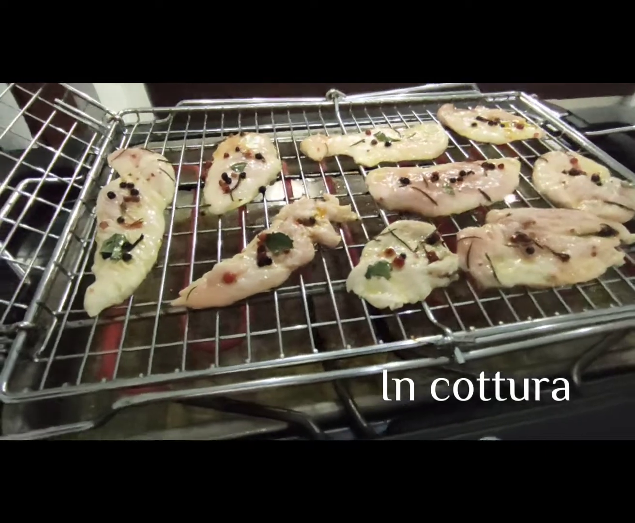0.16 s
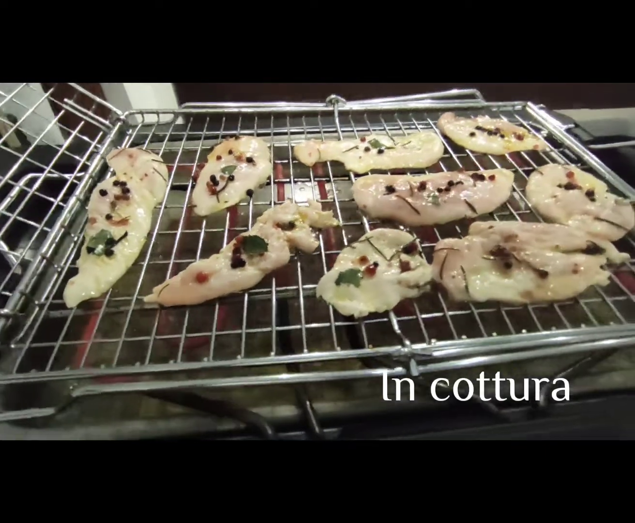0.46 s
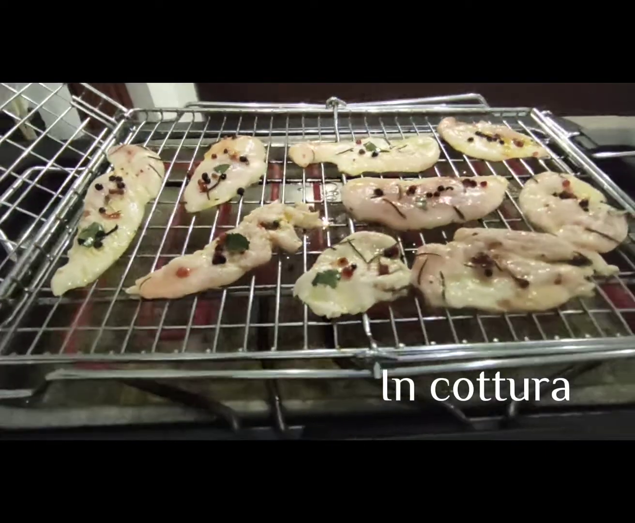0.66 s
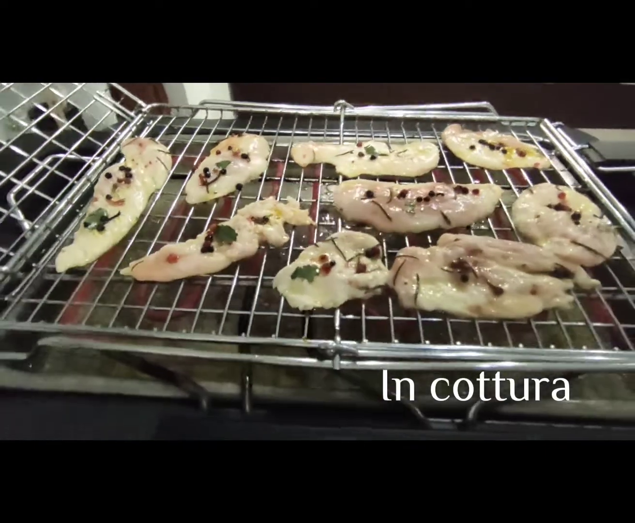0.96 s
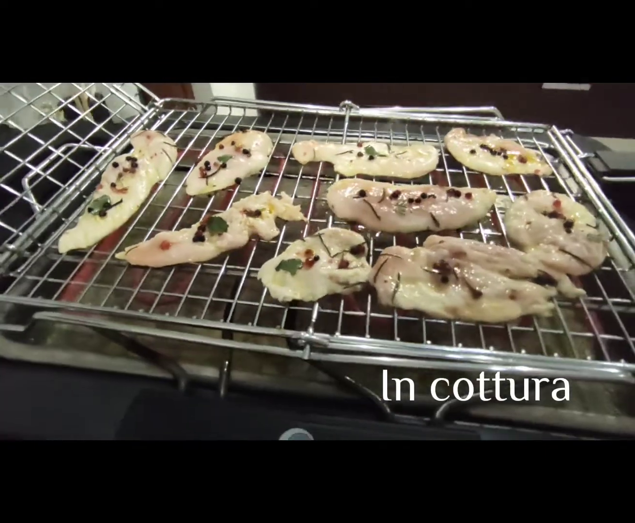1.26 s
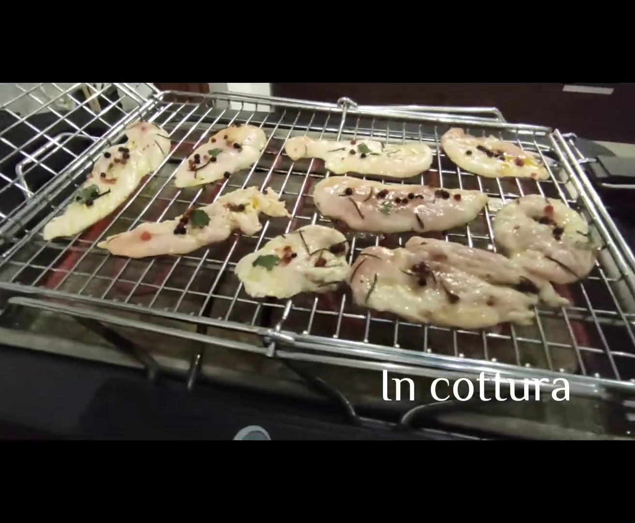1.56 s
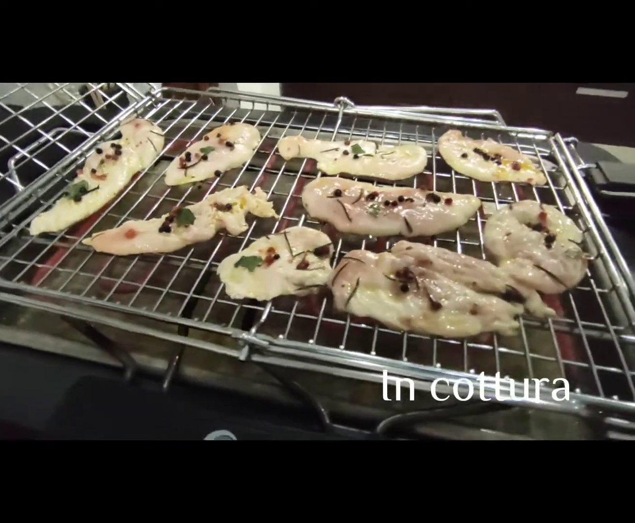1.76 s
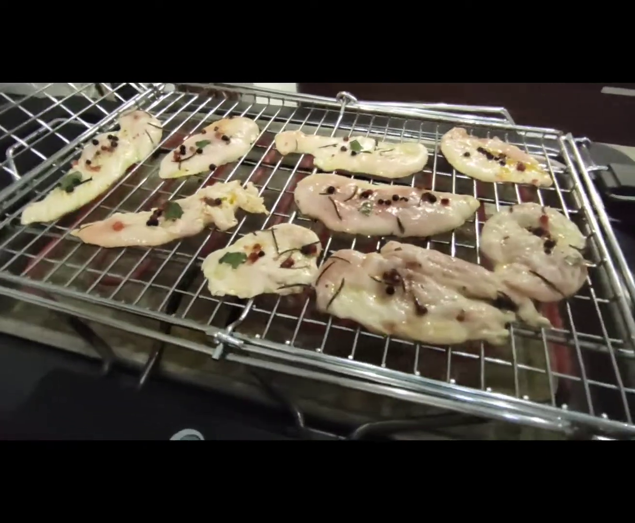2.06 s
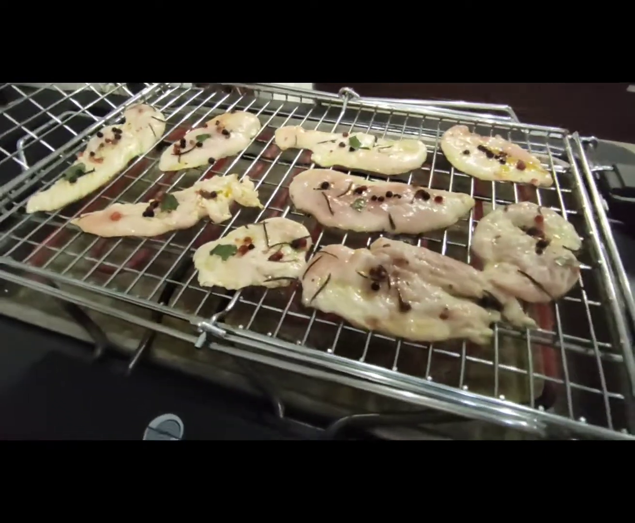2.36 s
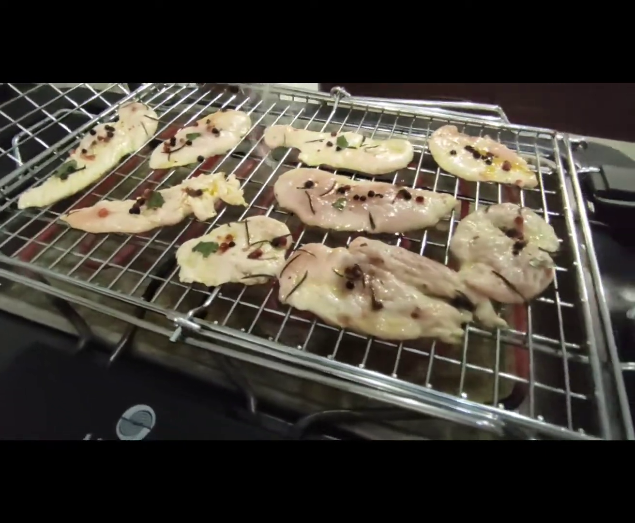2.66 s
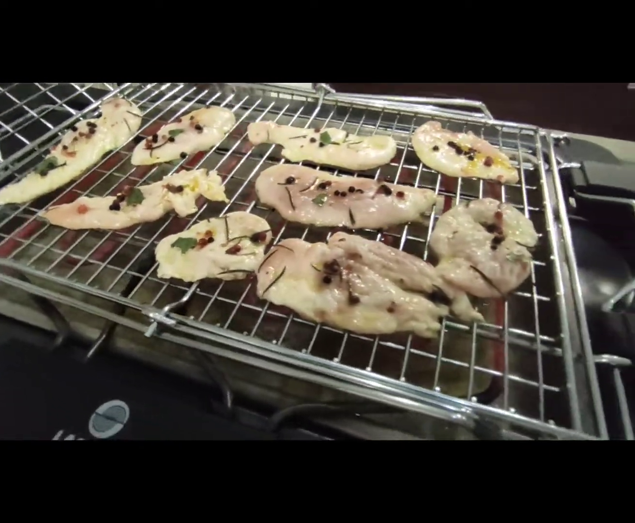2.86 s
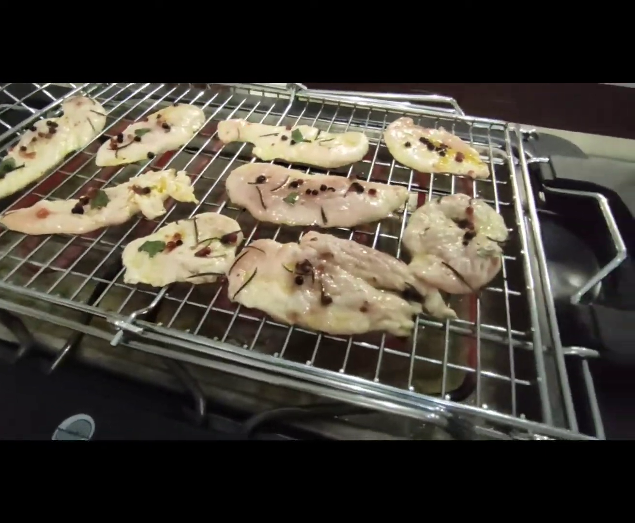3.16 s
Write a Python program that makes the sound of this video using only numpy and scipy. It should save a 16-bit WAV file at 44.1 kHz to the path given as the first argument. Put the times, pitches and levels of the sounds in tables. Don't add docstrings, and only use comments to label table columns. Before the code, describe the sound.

Meat sizzles on an electric grill, close up: a quiet, bright hiss of tiny crackles with rapid, nearly regular ticking throughout. Small pops cluster at 0.1-0.4 s; sharp spits flare at 0.94 and 1.16 s. It calms until 2.17 s, then pops thickly, strongest near 2.37 s. A hard sputter snaps on the right at 2.92-3.02 s and fizzes away. Faint low appliance hum, short kitchen reverberation, small stereo microphones.

```python
import sys
import numpy as np
from scipy import signal
from scipy.fft import rfft, irfft
from scipy.io import wavfile
from scipy.ndimage import uniform_filter1d

SR = 44100
rng = np.random.default_rng(int(sys.argv[2]) if len(sys.argv) > 2 else 0)


def log_audio(samples):
    frames = np.atleast_2d(samples).T
    limited = np.clip(frames, -1, 1)
    pcm = np.round(limited * 32767).astype(np.int16)
    wavfile.write(sys.argv[1], SR, pcm)


def amplitude_ratio(level_db):
    exponent = np.asarray(level_db, float) / 20
    return 10 ** exponent


N = 145530


def evened(x):
    return x / np.sqrt(np.mean(x ** 2) + 1e-20)


def read(points, hz):
    f, value = np.transpose(points)
    return np.interp(np.log(hz + 1), np.log(f + 1), value)


def add(mix, s, sound):
    part = mix[:, round(s * SR):][:, :sound.shape[1]]
    part += sound[:, :part.shape[1]]


def resonate(x, hz, width_hz):
    r = np.exp(-np.pi * width_hz / SR)
    return 2 * signal.lfilter([1 - r], [1, -r * np.exp(2j * np.pi * hz / SR)], x).real


def resonate_twice(x, hz, width_hz):
    return resonate(resonate(x, hz, width_hz), hz, width_hz)


def panned(x, lean_db):
    return x * amplitude_ratio(np.array([[.5], [-.5]]) * lean_db)


def capsules(x):
    # frequency in Hz, gain in dB.
    burst_colour = [(200, -34.5), (700, -21), (2300, -20), (3600, -20), (6200, -12.5), (10000, -17.5),
                    (15000, -20), (16300, -38.5)]
    # frequency in Hz, width in Hz, gain in dB.
    cavities = [
        [(7930, 660, 9), (8680, 1200, 14)],
        [(7400, 750, 13), (8060, 1330, 14)],
    ]
    hz = abs(np.fft.fftfreq(1024, 1 / SR))
    log_gain = np.log(amplitude_ratio(read(burst_colour, hz)))
    phase = -signal.hilbert(log_gain).imag
    taps = np.fft.ifft(np.exp(log_gain + 1j * phase)).real[:512]
    x = signal.oaconvolve(x, taps[None], axes=1)[:, :x.shape[1]]
    out = x.copy()
    for side, peaks in enumerate(cavities):
        for f, width_hz, db in peaks:
            out[side] += amplitude_ratio(db) * resonate_twice(x[side], f, width_hz)
    return out


def sizzle():
    # time in seconds, level in dB.
    heat = [(0, -50), (.14, -58), (.16, -44.5), (.3, -53.5), (.93, -53), (.945, -36.5), (1.1, -51),
            (1.16, -52.5), (1.17, -46.5), (1.4, -57.5), (2.15, -55.5), (2.19, -44.5), (2.24, -41.5),
            (2.28, -37.5), (2.43, -38.5), (2.53, -50.5), (3.0, -52.5), (3.015, -38)]
    cool_db_per_s, rest_db = 97, -54
    fizz_from_s, fizz_to_s, fizz_db, fizz_fade_db_per_s = 2.921, 2.98, 9, 400
    bubbles_per_s, bubble_s, biggest, spread_db = 2500, 0.00068, 0.0076, 3.5
    lag_s, scatter_db, smooth_db = .0003, 3, -4.5

    t = np.arange(N) / SR
    last_s, last_db = heat[-1]
    cooling_db = np.maximum(last_db - cool_db_per_s * (t - last_s), rest_db)
    heat_db = np.where(t < last_s, np.interp(t, *np.transpose(heat)), cooling_db)
    fizz = np.clip(fizz_db - fizz_fade_db_per_s * (t - fizz_to_s), 0, fizz_db)
    heat_db = heat_db + (t > fizz_from_s) * fizz

    hit, big, lag, lean, kind = rng.random((N, 5)).T
    size = amplitude_ratio(-spread_db * np.log(big + biggest)) * (hit < bubbles_per_s / SR)
    late = np.arange(N) + np.round((2 * lag - 1) * lag_s * SR).astype(int)
    late = np.clip(late, 0, N - 1)
    lean_gain = amplitude_ratio(scatter_db * (2 * lean - 1))
    clicks = np.zeros((2, N))
    shapes = rng.standard_normal((16, 128)) * np.exp(-t[:128] / bubble_s)
    for k, shape in enumerate(shapes):
        some = size * ((kind * len(shapes)).astype(int) == k)
        pulses = [some * lean_gain, np.bincount(late, some / lean_gain, N)]
        clicks += signal.oaconvolve(pulses, evened(shape)[None], axes=1)[:, :N]
    hiss = amplitude_ratio(smooth_db) * rng.standard_normal((2, N))
    return amplitude_ratio(heat_db) * evened(capsules(evened(clicks) + hiss))


def kitchen():
    # frequency in Hz, level in dB per Hz.
    floor = [(12, -27), (20, 5), (106, -11), (138, -9), (167, -4), (311, -10), (414, -10), (2860, -26),
             (6000, -19), (7800, -44), (13200, -120)]
    # frequency in Hz, left-right likeness from -1 to 1.
    likeness = [(60, -0.02), (180, 0.45), (550, 0.65), (1650, -0.042), (4970, 0.14), (15000, -0.25)]
    # frequency in Hz, left-right difference in dB.
    balance = [(60, 4), (240, 5.5), (950, 7.5), (3770, -10), (15000, 1)]
    # frequency in Hz, width in Hz, level in dB.
    hum = [
        (165.8, 2.9, -66),
        (209.8, 13.4, -77.5),
        (411.2, 31, -84.5),
    ]
    floor_db, hum_lean_db = -62.5, 8
    murmur_s, murmur_span_s, murmur_db = 1.65, 0.3, 8

    hz = np.fft.rfftfreq(N, 1 / SR)
    a, b = rfft(rng.standard_normal((2, N)))
    same = np.clip(read(likeness, hz), -1, 1)
    z = np.array([a, same * a + np.sqrt(1 - same ** 2) * b])
    z = z * panned(amplitude_ratio(read(floor, hz)), read(balance, hz))
    out = amplitude_ratio(floor_db) * evened(irfft(z, N))

    t = np.arange(N) / SR
    steady = 0.68
    for f, width_hz, db in hum:
        waver = evened(resonate_twice(rng.standard_normal(N + SR), f, width_hz)[SR:])
        tone = steady * np.sqrt(2) * np.sin(2 * np.pi * f * t) + (1 - steady) * waver
        out += panned(amplitude_ratio(db) * evened(tone), hum_lean_db)
        steady = 0
    swell = np.exp(-((t - murmur_s) / murmur_span_s) ** 2)
    return out + panned(amplitude_ratio(db + murmur_db) * swell * np.roll(waver, SR), hum_lean_db)


def vent():
    # time in seconds, ticks so far, peak in dB.
    venting = [(0.003, 0, -45), (.315, 27, -43), (.504, 47, -41), (.754, 77, -41), (.920, 96, -41),
               (1.118, 120, -42), (1.304, 143, -41), (1.436, 158, -45), (1.734, 197, -43),
               (1.964, 225, -40), (2.100, 240, -40), (2.169, 248, -39), (2.582, 290, -42),
               (2.779, 310, -42), (3.058, 340, -36), (3.198, 354, -38), (3.250, 359, -36),
               (3.297, 363, -35)]
    # frequency in Hz, width in Hz.
    tick_ring = [
        (8400, 1600),
        (7810, 1180),
    ]
    jitter_s, left_lag_s = .0004, .0006
    level_db, scatter_db, lean_db = -.5, 1.5, -7

    s, count, db = np.transpose(venting)
    out = np.zeros((2, N))
    clicks = np.arange(300) == np.array([[round(left_lag_s * SR)], [0]])
    for at in np.interp(np.arange(count[-1] + 1), count, s):
        shift, size, bend = rng.standard_normal(3)
        tick = np.array([resonate_twice(1. * click, f * (1 + .03 * bend), width_hz)
                         for click, (f, width_hz) in zip(clicks, tick_ring)])
        tick = tick / abs(tick).max(axis=1, keepdims=True)
        tick = tick * amplitude_ratio(np.interp(at, s, db) + level_db + scatter_db * size)
        add(out, abs(at + jitter_s * shift), panned(tick, lean_db))
    return out


def spitting(noise, length_s):
    t = np.arange(noise.shape[-1]) / SR
    return noise * t / length_s * np.exp(-2 * t / length_s)


def burst(length_s, body_db, ring):
    spit = spitting(rng.standard_normal((2, 900)), length_s)
    top = ring(spit)
    plop = resonate_twice(spit[0], 1480, 2600)
    plop = signal.lfilter(*signal.butter(2, 550, "high", fs=SR), plop)
    top = top / abs(top).max(axis=1, keepdims=True)
    return top + amplitude_ratio(body_db + 0.5) * plop / abs(plop).max()


def pops():
    # start in seconds, peak in dB, low body re peak in dB, left-right in dB.
    large_bursts = [(0.0644, -47, -29, -9), (0.1271, -37.5, -37, -2), (0.1459, -26.5, -31, -3),
                    (0.187, -33, -18.5, -2.0), (0.215, -37, -37, 1), (0.2378, -35, -44, -12.5),
                    (0.3142, -42, -33, -10), (0.3634, -35, -34, -2), (0.5130, -40, -21, -6),
                    (0.5470, -40.5, -28, -4), (0.7662, -41, -37, -5), (0.8909, -36.5, -24, -5),
                    (0.9382, -16.5, -27, -9), (0.9523, -29, -23, 4), (1.163, -24.5, -45, -4.5),
                    (2.1745, -41, -29, -4), (2.1846, -37, -29, -4), (2.1889, -33, -32, -9),
                    (2.1960, -35, -28, -4), (2.25, -38, -16, -11), (2.2562, -32.5, -8.5, -2),
                    (2.2724, -29, -19, -13), (2.2862, -24.5, -16.5, -2.5), (2.336, -33.5, -13, -1),
                    (2.365, -16.5, -23, -2), (2.3800, -31, -24, -1), (2.3930, -32, -24, -4),
                    (2.399, -30, -26, -4), (2.4236, -24, -22.5, -4), (2.4510, -32.5, -25, -4),
                    (2.4720, -38, -30, -2), (2.5559, -33.5, -38, -4), (2.5660, -36, -36, -2),
                    (2.6845, -32.5, -25, -4), (2.7254, -32, -46, -4.5), (2.8570, -39, -24, -9),
                    (2.8795, -33, -40, -4.5), (3.2350, -43.5, -14, -6)]
    out = np.zeros((2, N))
    for s, db, body_db, lean_db in large_bursts:
        add(out, s, panned(amplitude_ratio(db + 1.5) * burst(.002, body_db, capsules), lean_db))
    return out


def puff(db, hz, width_hz, length_s):
    x = resonate_twice(spitting(rng.standard_normal(3000), length_s), hz, width_hz)
    return amplitude_ratio(db) * x / abs(x).max()


def knocks():
    # start in seconds, peak in dB, centre in Hz, width in Hz, length in seconds.
    spits = [
        (1.1810, -49.5, 440, 200, 0.011),
        (2.8000, -56, 1700, 1400, .003),
        (2.9500, -44.5, 670, 790, 0.0031),
        (2.9220, -42.5, 1120, 700, 0.0034),
        (1.7, -52, 4400, 1600, .003),
        (2.6850, -50, 2000, 2300, 0.0017),
        (2.2870, -41, 770, 700, 0.004),
        (0.8600, -58, 860, 1300, .0035),
        (3.0110, -44, 770, 980, 0.0032),
        (2.9225, -42.5, 2200, 830, 0.0021),
    ]
    out = np.zeros((2, N))
    for s, db, hz, width_hz, length_s in spits:
        add(out, s, panned(puff(db, hz, width_hz, length_s), 1.5))
    return out


def snaps():
    # start in seconds, peak in dB, centre in Hz, width in Hz, left-right in dB.
    ruptures = [
        (.9386, -32, 14600, 2500, -1),
        (.9390, -33.5, 2160, 1000, 3),
        (1.1635, -46.5, 2180, 1010, -2),
        (2.0655, -49, 14000, 3500, -6),
        (2.3655, -35.5, 2260, 1500, -2),
        (2.6845, -47, 14000, 4000, -3),
        (2.9925, -30, 13000, 5000, -6),
        (3.0101, -13.5, 10400, 6900, -2),
        (3.0103, -30, 2200, 2200, -4),
        (3.1236, -39, 2380, 2620, -18),
    ]
    out = np.zeros((2, N))
    for s, db, hz, width_hz, lean_db in ruptures:
        add(out, s, panned(puff(db, hz, width_hz, 0.00062), lean_db))
    return out


def sputter():
    # start in seconds, peak in dB, low body re peak in dB, left-right in dB.
    sputters = [(2.9209, -24, -20, -13), (2.9231, -20.5, -20.5, -10), (2.9284, -34, -30, -10),
                (2.9400, -22.5, -41, -15.5), (2.9458, -26, -32, -17), (2.9530, -29, -21, -12),
                (2.9610, -23, -28, -20), (2.9661, -23, -26, -14.5), (2.9744, -33, -28, -5),
                (2.9815, -38, -30, -6), (2.9923, -17.5, -33, -17), (3.0102, -14.5, -30, -13),
                (3.0115, -18, -30, -18.5), (3.0247, -33, -24, -3)]

    def ring(x):
        left, right = capsules(x)
        return np.array([left, 0.052 * right + resonate_twice(x[1], 7390, 600)])

    out = np.zeros((2, N))
    for s, db, body_db, lean_db in sputters:
        add(out, s, panned(amplitude_ratio(db - 1) * burst(0.00078, body_db, ring), lean_db))
    return out


def room(x):
    t60_s = 0.21
    t = np.arange(SR // 2) / SR
    tail = rng.standard_normal((2, len(t))) * amplitude_ratio(-60 * t / t60_s) * (t > .003)
    crossed = x + 0.3 * x[::-1]
    return signal.fftconvolve(crossed, tail / np.linalg.norm(tail[0]), axes=1)[:, :N]


def wavering_bands(x):
    # frequency in Hz, threshold in standard deviations.
    rarity = [(1000, 3), (2000, 1.7), (3500, .8), (6200, 1), (7000, 3), (9200, 3), (10000, .7),
              (15350, 1.3), (15700, -2.2)]
    drop_db, waver_db = -30, 1.5
    hz, _, z = signal.stft(x, SR, nperseg=1024, noverlap=768)
    need = rng.standard_normal(z.shape[1:])
    need = uniform_filter1d(need, size=6, axis=0)
    need = evened(uniform_filter1d(need, size=12, axis=1))
    rare = read(rarity, hz)[:, None]
    gain_db = drop_db * np.clip(8 * (need - rare), 0, 1)
    gain_db = gain_db - waver_db * need * np.clip(3 - rare, 0, 1)
    return signal.istft(z * amplitude_ratio(gain_db), SR, nperseg=1024, noverlap=768)[1][:, :N]


def scene():
    grill = sizzle() + vent() + pops() + knocks() + snaps() + sputter()
    return grill + amplitude_ratio(-14) * room(grill) + kitchen()


def band_limit(x):
    return signal.sosfilt(signal.butter(12, 16470, fs=SR, output="sos"), x)


def record(dry):
    mix = wavering_bands(dry)
    return band_limit(mix)


dry = scene()
out = record(dry)
log_audio(out)
```